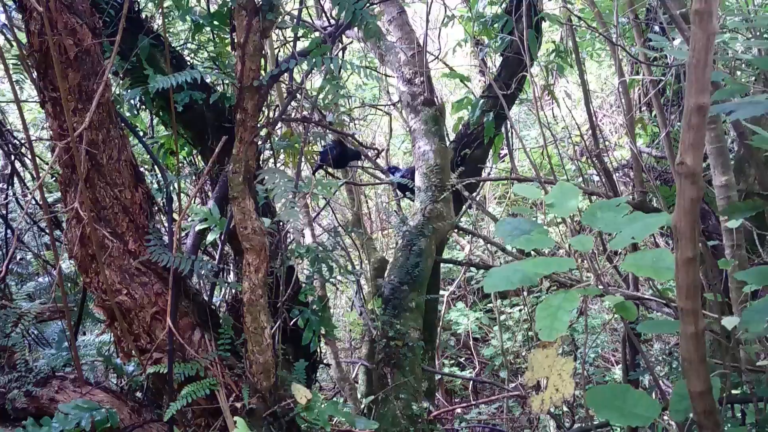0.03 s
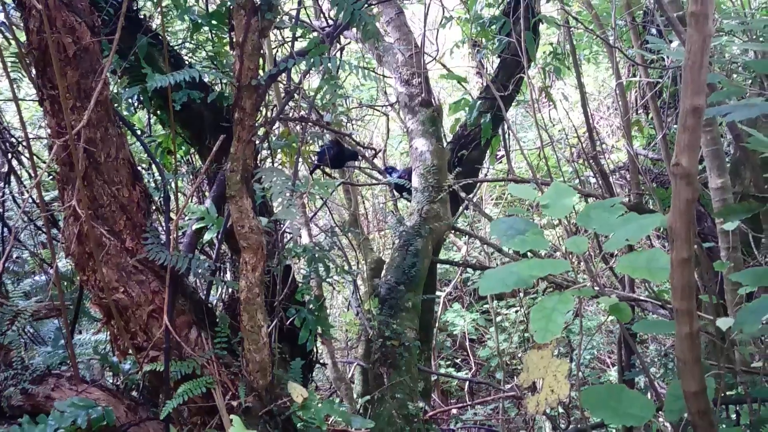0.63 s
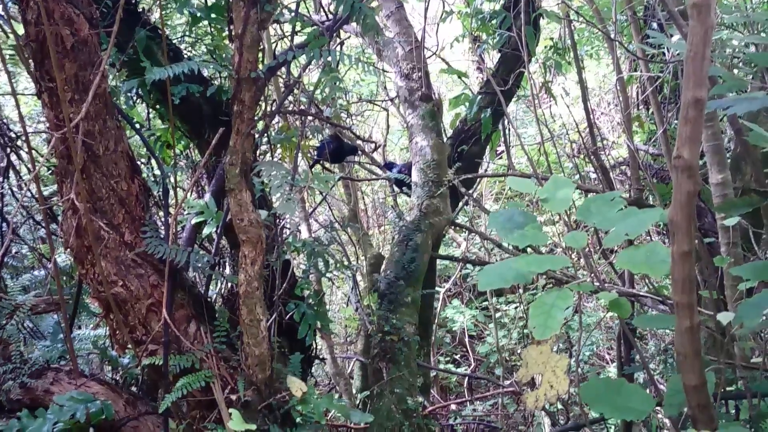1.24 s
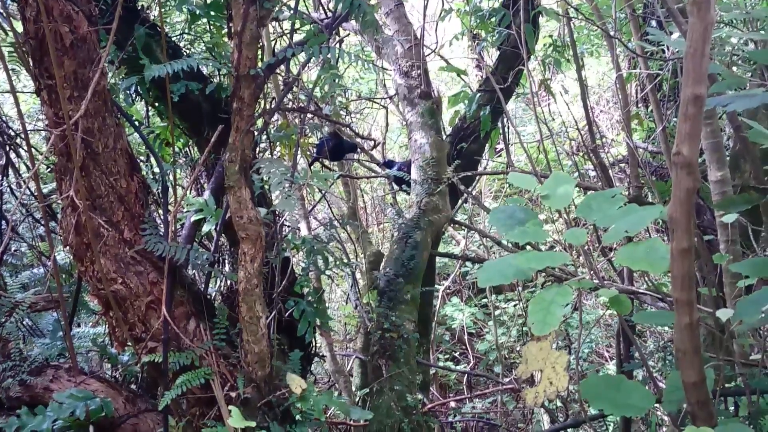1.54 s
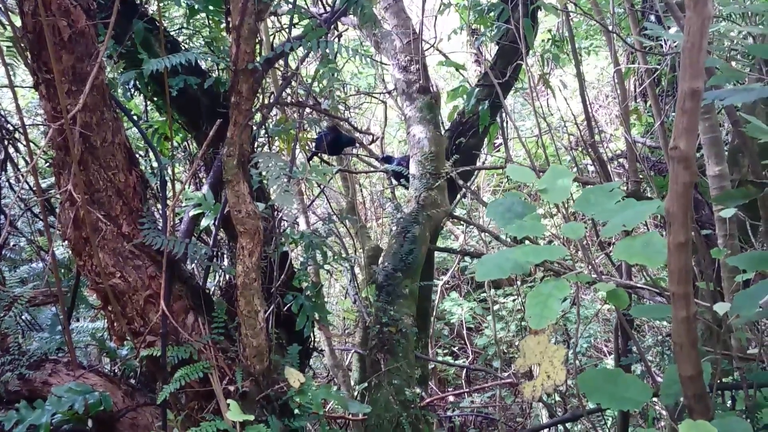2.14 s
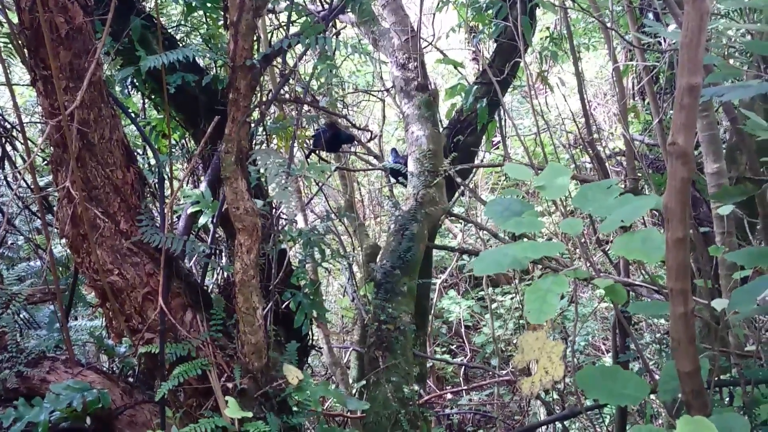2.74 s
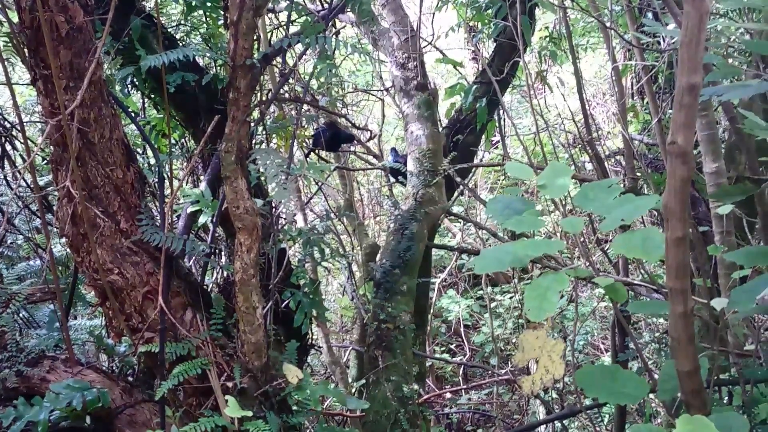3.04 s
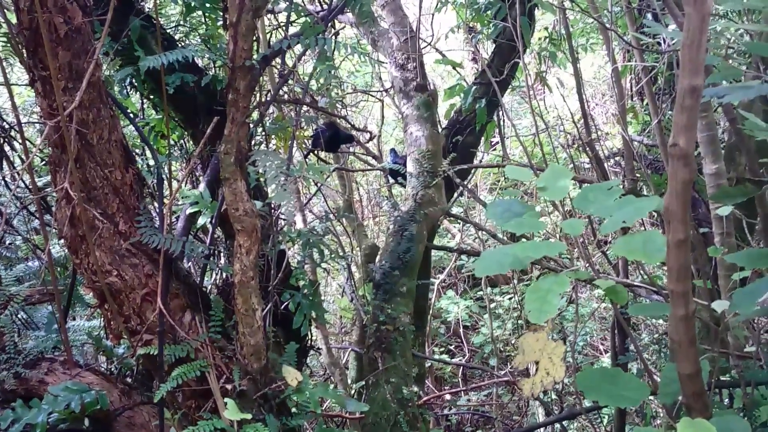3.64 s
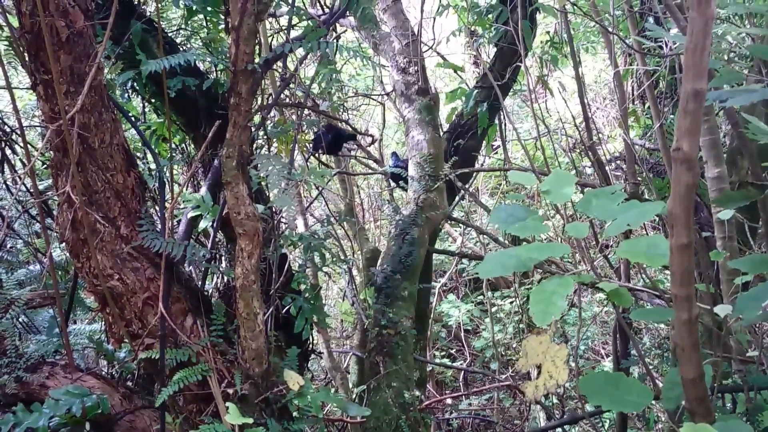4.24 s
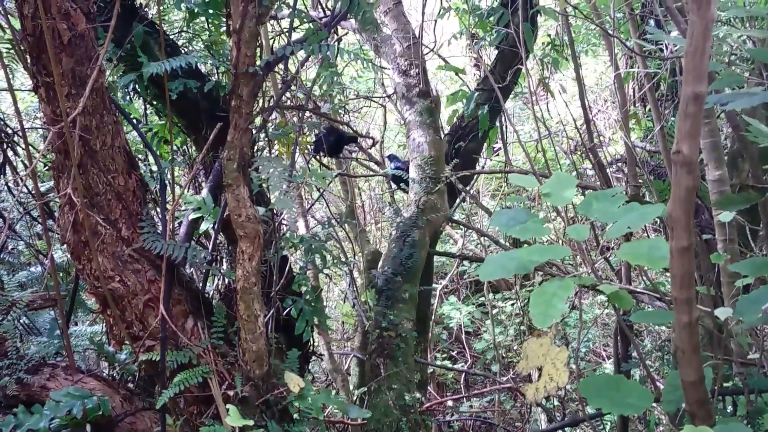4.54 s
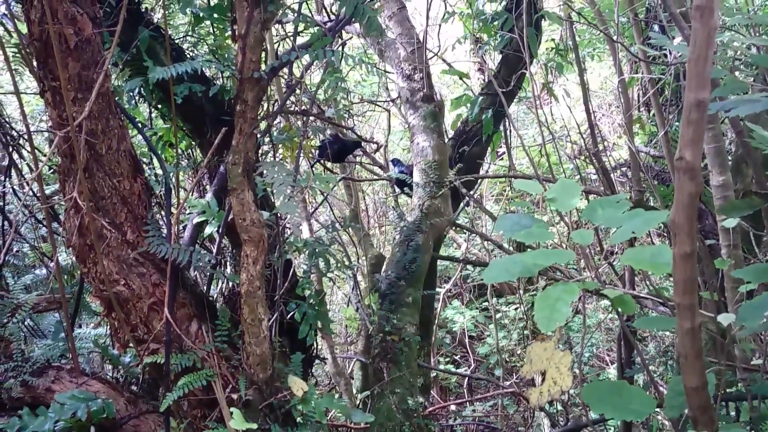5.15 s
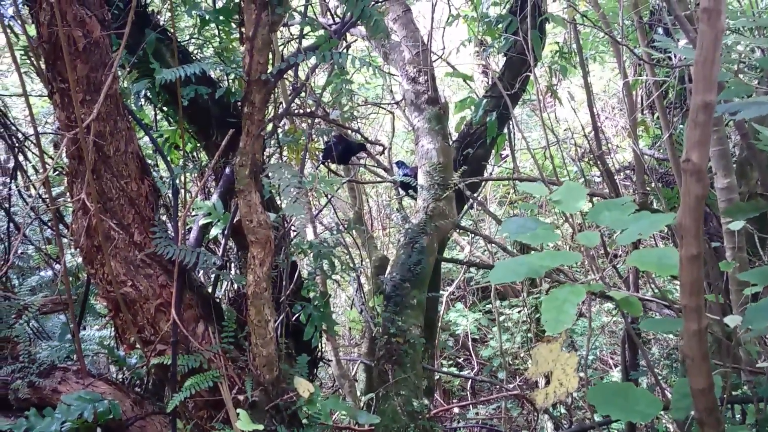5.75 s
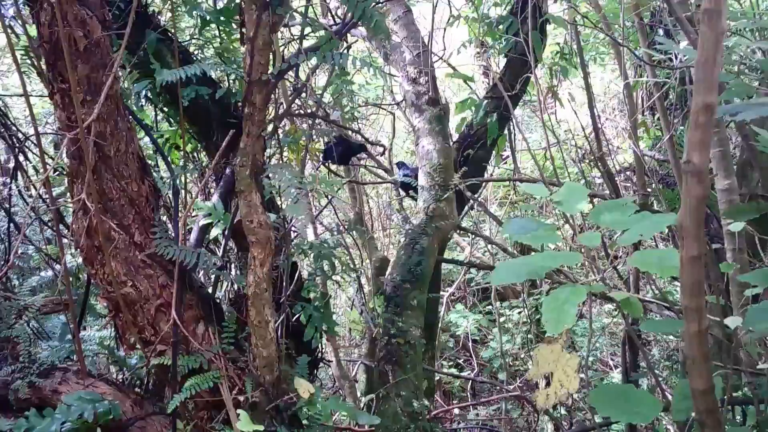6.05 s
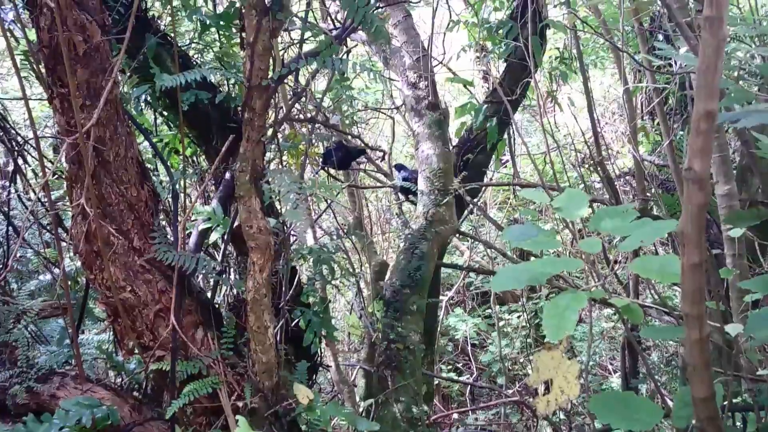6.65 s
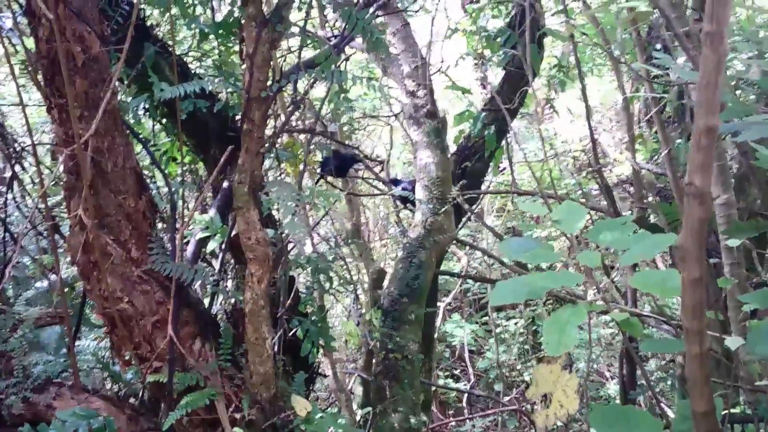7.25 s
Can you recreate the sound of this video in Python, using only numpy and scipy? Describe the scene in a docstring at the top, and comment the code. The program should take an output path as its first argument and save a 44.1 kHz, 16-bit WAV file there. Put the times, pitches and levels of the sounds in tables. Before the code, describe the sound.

A small microphone pop opens onto a quiet forest, and a faint, steady insect hiss comes up at about 0.6 seconds. A distant bird repeats a very faint two-note song until 1.6 seconds. Thin high chirps, pips and far hoarse calls are scattered throughout, with a clearer falling chirp near 3.8 seconds and a few faint, dull handling bumps. From 4.8 to 5.3 seconds a nearby songbird makes seven quick, soft clucks that sink in pitch. A small bird repeats quick upward slides until 6 seconds, and a neighbour whistles softly around 5.6. At 6.6 seconds the close bird gives a loud falling whistle, then a softer, wavering held note. Two short, harsh rasps, the loudest sounds, follow at about 7 and 7.2 seconds, with quiet low notes beneath and after them. The trees add a short, scattered echo.

```python
"""A tui sings in dense forest: windpipe clucks, a loud down-slur, a beating two-voice note from both
sides of the syrinx, then two harsh rasps, trains of snaps that ring throat and beak. A neighbour
whistles softly after the clucks. Smaller birds call over a steady insect hiss; leaves and trunks
scatter every call. A hand-held camera wakes with a pop at the start and takes a few dull bumps;
its two microphones have opposite polarity."""
import sys
import numpy as np
from scipy import signal
from scipy.fft import rfft, irfft, next_fast_len
from scipy.io import wavfile
from scipy.ndimage import uniform_filter1d, minimum_filter1d

SR = 44100
rng = np.random.default_rng(int(sys.argv[2]) if len(sys.argv) > 2 else 0)


def digitize_waveform(pressure):
    """Quantize a signal to 16-bit integers and store it at the path in sys.argv[1].

    Rows of a 2-D input are taken as channels; values are limited to [-1, 1].
    """
    field = np.atleast_2d(pressure).T
    bounded = np.clip(field, -1, 1)
    quanta = np.round(bounded * 32767).astype(np.int16)
    wavfile.write(sys.argv[1], SR, quanta)


N = 326781
T = np.arange(N) / SR

# throat and beak response, one curve per rasp: freq_hz, gain_db
THROAT_CURVES = [
    [(350, -56), (600, -43), (737, -45), (982, -31), (1400, -23.5), (1540, -24.5), (1670, -10.5),
     (2000, -27), (2600, -20.5), (3060, -15), (3510, -28), (3970, -14.5), (4940, -3), (7140, -14),
     (8530, -31.5), (15800, -42.5)],
    [(350, -88), (600, -45), (1170, -26.5), (1310, -23), (1520, -16), (1670, -12), (1890, -18.5),
     (2600, -12.5), (3100, -15), (3910, -20.5), (4940, -0.5), (5660, -3), (6320, -13.5), (6860, -6.5),
     (8770, -28), (15800, -37)],
]


def undb(db):
    """Decibels to gain."""
    return 10 ** (np.asarray(db) / 20)


def unit(x):
    """Scale to rms 1."""
    return x / np.sqrt(np.mean(x ** 2))


def clock(length_s):
    """Sample times of a short sound."""
    return np.arange(int(length_s * SR)) / SR


def decay(t, t60_s):
    """Envelope falling 60 dB in t60_s."""
    return np.exp(-np.log(1000) * t / t60_s)


def add(track, start_s, x):
    """Mix x into the track."""
    i = max(int(start_s * SR), 0)
    track[..., i:i + x.shape[-1]] += x[..., :max(N - i, 0)]


def shape(x, gain):
    """Filter by a gain function of frequency."""
    size = next_fast_len(x.shape[-1])
    freq_hz = np.fft.rfftfreq(size, 1 / SR) + 1e-3
    return irfft(rfft(x, size) * gain(freq_hz), size)[..., :x.shape[-1]]


def colour(points):
    """Gain function through (freq_hz, gain_db) points."""
    hz, db = np.transpose(points)
    return lambda f: undb(np.interp(np.log(f), np.log(hz), db))


def ring(points, size=512):
    """Minimum-phase impulse response of the given colour, unit energy."""
    gain = colour(points)(np.fft.rfftfreq(size, 1 / SR) + 1)
    cepstrum = irfft(np.log(gain))
    cepstrum[1:size // 2] *= 2
    cepstrum[size // 2 + 1:] = 0
    response = irfft(np.exp(rfft(cepstrum)))
    return response / np.linalg.norm(response)


def walk(rate_hz):
    """Smooth random drift, spread near 1."""
    return 1.2 * np.interp(T * rate_hz, np.arange(8192), rng.standard_normal(8192))


def insects(hiss_db=0.5, air_db=3.5, flicker_db=1.46, bass_hz=250, air_follows=0.78):
    """Insect chorus swelling near 5.8 kHz over forest air; bass alike on both microphones."""
    # insect and air spectrum: freq_hz, relative_db
    spectrum = [(18, -40), (30, -28), (64, -2.5), (183, -15), (286, -18), (509, -20), (735, -18.5),
                (1210, -17.5), (1570, -13.5), (2520, -12), (3540, -10.5), (4260, -5.5), (5830, 1.5),
                (7390, -15.5), (15800, -29)]
    # chorus swell: time_s, level_db
    swell = [(.6, -63), (0.8, -61.5), (1.76, -57.5), (2.78, -61.5), (3.44, -60), (4.63, -60), (4.93, -58.5),
             (5.03, -58.5), (6.15, -60), (6.55, -57.5)]
    own, shared = rng.standard_normal((2, N)), rng.standard_normal(N)
    coherence = lambda f: .8 / (1 + (f / bass_hz) ** 2)
    noise = shape(own, lambda f: np.sqrt(1 - coherence(f)))
    noise += shape(shared, lambda f: np.sqrt(coherence(f)))
    forest = shape(noise, colour(spectrum))
    hiss = shape(forest, lambda f: 1 / (1 + ((f - 5800) / 1400) ** 4))
    air = forest - hiss
    time_s, level_db = np.transpose(swell)
    swell_db, median_db = np.interp(T, time_s, level_db), np.median(level_db)
    hiss_gain = undb(swell_db + hiss_db + flicker_db * walk(20))
    air_gain = undb(median_db + air_follows * (swell_db - median_db) + air_db + .5 * walk(3.52))
    return (hiss * hiss_gain + air * air_gain) / hiss.std()


def glides(notes, buzz, buzz_hz, waver=0.0079):
    """Sliding notes; a fast pitch wobble of the syrinx makes them buzz."""
    out = np.zeros(N)
    wobble = 1 + waver * walk(180) + buzz * np.sin(2 * np.pi * buzz_hz * T + walk(90))
    for start_s, length_s, start_hz, end_hz, level_db in notes:
        t = clock(length_s)
        pitch_hz = np.geomspace(start_hz, end_hz, len(t)) * np.interp(start_s + t, T, wobble)
        tone = np.sqrt(2) * np.sin(2 * np.pi * np.cumsum(pitch_hz) / SR)
        add(out, start_s, undb(level_db) * tone * signal.windows.tukey(len(t), .5))
    return out


def couplets(fall_s=0.041, fall_ratio=1.19, fall_db=-2, flat_after_s=.062, flat_s=0.06):
    """Distant two-note song: a short buzzy fall, then a flat note at its end pitch."""
    # couplets: start_s, flat_pitch_hz, level_db
    song = [(.115, 3800, -58.5), (.305, 3745, -60.5), (.508, 3700, -61.5), (.762, 3704, -58),
            (1.0, 3530, -63), (1.255, 3540, -61.5), (1.52, 3484, -59.5)]
    falls = [(s, fall_s, fall_ratio * hz, hz, db + fall_db) for s, hz, db in song]
    flats = [(s + flat_after_s, flat_s, hz, hz, db) for s, hz, db in song]
    return (glides(falls, buzz=0.03, buzz_hz=122, waver=0.017)
            + glides(flats, buzz=.01, buzz_hz=120, waver=0.011))


def thin_notes(faint_count=14, low_hz=1500, high_hz=5450, faint_s=.06, faint_db=-68.5, glide=.03):
    """Single slurs among the trees, plus fainter notes at random times and pitches."""
    # slurs: start_s, length_s, start_hz, end_hz, level_db
    slurs = [(.26, 0.074, 2040, 1930, -65.5), (1.55, 0.027, 908, 895, -64.5),
             (1.87, 0.045, 4280, 4180, -63), (2.97, .07, 3200, 3240, -68), (3.24, 0.05, 3150, 3190, -66),
             (2.28, .05, 1544, 1594, -67), (4.06, 0.049, 1594, 1594, -62.5), (4.7, 0.097, 5440, 5170, -52),
             (5.14, .11, 2540, 2147, -62.5), (5.25, 0.087, 4340, 4260, -57), (5.4, 0.074, 2245, 2160, -61),
             (5.475, 0.094, 4410, 3726, -57), (5.73, .06, 4330, 3560, -60)]
    faint = []
    for when, height, slope in rng.random((faint_count, 3)):
        start_hz = low_hz * (high_hz / low_hz) ** height
        end_hz = start_hz * (1 + glide * (2 * slope - 1))
        faint.append((when * T[-1], faint_s, start_hz, end_hz, faint_db))
    return glides(slurs + faint, buzz=.008, buzz_hz=110)


def handling(body_hz=65, decay_s=0.02):
    """The hand bumps the camera body; each microphone gets the thud at its own phase."""
    # bumps: start_s, level_db
    bumps = [(.61, -67), (.69, -68), (.79, -69), (1.01, -69), (2.748, -63), (2.81, -64), (4.169, -69.5),
             (6.091, -72)]
    out, t = np.zeros((2, N)), clock(.2)
    envelope = t / decay_s * np.exp(1 - t / decay_s)
    for start_s, level_db in bumps:
        phase = 2 * np.pi * (body_hz * rng.uniform(0.73, 1.23) * t + rng.random((2, 1)))
        add(out, start_s, undb(level_db) * np.sin(phase) * envelope)
    return out


def chirps():
    """High falling chirps, buzzing with syrinx wobble."""
    # chirps: start_s, length_s, start_hz, end_hz, level_db
    falls = [(1.61, 0.055, 6130, 5340, -55), (1.84, 0.051, 6900, 4140, -70), (1.88, 0.071, 5800, 5290, -54),
             (2.36, 0.072, 6260, 4390, -48), (3.775, 0.085, 6490, 4275, -43.5)]
    return glides(falls, buzz=0.017, buzz_hz=230)


def hoarse_calls(hoarse_hz=1904, hoarse_width_hz=500, hiss_width_hz=1500):
    """Noise-band calls: a far hoarse bird and high hisses from the canopy."""
    # hoarse bird: start_s, length_s, level_db
    croaks = [(1.87, 0.15, -64.5), (2.849, .2, -68), (3.389, .14, -64.5), (4.182, 0.17, -67),
              (4.368, 0.11, -57.5), (6.001, 0.073, -56), (6.24, .2, -63.5)]
    # canopy hisses: start_s, length_s, centre_hz, level_db
    hisses = [(1.832, 0.065, 5130, -53.5), (2.516, .05, 6360, -61.5), (6.156, .51, 7540, -73.5)]
    bands = [(s, length_s, hoarse_hz, hoarse_width_hz, db) for s, length_s, db in croaks]
    bands += [(s, length_s, hz, hiss_width_hz, db) for s, length_s, hz, db in hisses]
    out = np.zeros(N)
    for start_s, length_s, centre_hz, width_hz, level_db in bands:
        noise = rng.standard_normal(SR)[:int(length_s * SR)]
        call = unit(shape(noise, lambda f: 1 / (1 + (2 * (f - centre_hz) / width_hz) ** 4)))
        add(out, start_s, undb(level_db) * call * signal.windows.tukey(len(call), .5))
    return out


def pips(count=4, start_s=2.87, every_s=0.12, length_s=0.062, start_hz=5900, end_hz=5870, db=-59.5):
    """Even run of thin, rough, nearly flat pips."""
    notes = [(start_s + k * every_s, length_s, start_hz, end_hz, db) for k in range(count)]
    return glides(notes, buzz=.012, buzz_hz=150, waver=0.0112)


def clucks(start_hz=990, rest_hz=624, sink_s=0.29, bright_db=-1.5, dull_db_per_s=72):
    """Snaps ring the windpipe: a sagging low mode, upper modes, a tick. The run sinks and dulls."""
    # clucks: start_s, level_db
    run = [(4.788, -45.5), (4.890, -47), (4.977, -45.5), (5.049, -46.5), (5.117, -46), (5.183, -45.5),
           (5.253, -44.5)]
    # upper windpipe modes: freq_hz, t60_s, gain_db
    modes = [(2820, 0.019, 10), (4900, 0.023, 18), (5080, 0.018, 19), (7200, 0.0057, -2)]
    sag, sag_s, low_t60_s = 0.22, 0.0029, 0.037
    tick_db, tick_s, rise_s = 13, 0.0012, .0005
    out, t = np.zeros(N), clock(.08)
    upper = sum(undb(db) * np.sin(2 * np.pi * hz * t) * decay(t, t60_s) for hz, t60_s, db in modes)
    attack = 1 - np.exp(-t / rise_s)
    for start_s, level_db in run:
        elapsed_s = start_s - run[0][0]
        centre_hz = rest_hz + (start_hz - rest_hz) * np.exp(-elapsed_s / sink_s)
        pitch_hz = centre_hz * (1 + sag * (np.exp(-t / sag_s) - .5))
        low = np.sin(2 * np.pi * np.cumsum(pitch_hz) / SR) * decay(t, low_t60_s)
        throat_noise = signal.fftconvolve(rng.standard_normal(len(t)), ring(THROAT_CURVES[1]), "same")
        tick = undb(tick_db) * unit(throat_noise) * np.exp(-t / tick_s)
        brightness = undb(bright_db - dull_db_per_s * elapsed_s)
        add(out, start_s, undb(level_db) * (low + brightness * (upper + tick)) * attack)
    return out


def flicks(length_s=.038, start_hz=4780, end_hz=6070):
    """A small bird repeats one quick upward slide."""
    # flicks: start_s, level_db
    repeats = [(5.378, -49.5), (5.548, -54), (5.688, -58), (5.854, -52.5), (6.028, -50)]
    return glides([(s, length_s, start_hz, end_hz, db) for s, db in repeats], buzz=0.014, buzz_hz=112)


def whistles(notes, overtones_db, breath_db, waver=0.0079, drop_db=-17):
    """Syrinx near-sines that swell, hold, then slide and fade; overtones and breath grow with effort."""
    out = np.zeros(N)
    for start_s, attack_s, held_s, drop_s, start_hz, held_hz, end_hz, level_db in notes:
        t = clock(held_s + drop_s)
        corners_s = [0, held_s, held_s + drop_s]
        pitch_hz = np.exp(np.interp(t, corners_s, np.log([start_hz, held_hz, end_hz])))
        phase = 2 * np.pi * np.cumsum(pitch_hz * (1 + waver * walk(206)[:len(t)])) / SR
        swell = np.sin(np.pi / 2 * np.clip(t / attack_s, 1e-3, 1))
        envelope_db = level_db + 20 * np.log10(swell) + np.interp(t, corners_s, [0, 0, drop_db])
        effort = undb(0.89 * (envelope_db + 34))
        breath = undb(breath_db) * np.diff(rng.standard_normal(SR))[:len(t)]
        overtones = sum(undb(db) * np.sin(k * phase) for k, db in enumerate(overtones_db, 2))
        tone = np.sin(phase) + effort * (breath + overtones)
        add(out, start_s, np.sqrt(2) * undb(envelope_db) * tone * signal.windows.tukey(len(t), .08))
    return out


def neighbour():
    """Soft whistle from further off: rises slowly, drops at the end."""
    # whistles: start_s, attack_s, held_s, drop_s, start_hz, held_hz, end_hz, level_db
    notes = [(5.602, 0.015, 0.039, 0.034, 1617, 1607, 1650, -52),
             (5.66, 0.036, .077, 0.0487, 1650, 1775, 1080, -55.5)]
    return whistles(notes, overtones_db=(), breath_db=-50)


def tui_whistles():
    """The tui's pure notes; the two sides of the syrinx beat where they overlap."""
    # whistles: start_s, attack_s, held_s, drop_s, start_hz, held_hz, end_hz, level_db
    notes = [(6.579, 0.042, 0.031, .031, 1785, 1755, 1054, -17),
             (6.705, 0.04, 0.16, 0.041, 1060, 1047, 900, -35),
             (6.715, .05, 0.074, 0.063, 1112, 1154, 1100, -42),
             (7.04, 0.1, 0.073, 0.066, 857, 608, 514, -47), (7.27, 0.026, 0.056, .03, 598, 570, 554, -53),
             (7.295, 0.016, 0.039, .04, 683, 680, 685, -42.5)]
    return whistles(notes, overtones_db=(-32, -44, -49), breath_db=-55)


def snaps(length_s, gap_s, count=14, lag_s=.0098, settle_snaps=1.2):
    """Rows of (offset_s, gain_db) for one rasp: snaps speed up and swell, hold, then fade."""
    attack_s, attack_db, fade_from_s, fade_db_per_s = 0.032, -8, 0.057, 286
    k = np.arange(count)
    offset_s = k * gap_s + lag_s * (1 - np.exp(-k / settle_snaps))
    gain_db = attack_db * np.maximum(1 - offset_s / attack_s, 0)
    gain_db -= fade_db_per_s * np.maximum(offset_s - fade_from_s, 0)
    gain_db += 0.1 * rng.standard_normal(count)
    return np.transpose([offset_s, gain_db])[offset_s < length_s]


def rasps(snap_s=0.0013, air_db=-8, air_s=0.014, shelf_hz=2500, low_db=-1, open_db_per_s=44):
    """The syrinx snaps about 100 times a second; each snap and its air ring the throat and beak."""
    # rasps: start_s, length_s, snap_gap_s, level_db
    calls = [(6.955, .098, .0095, -11.5), (7.1528, .098, .0105, -11)]
    out, t = np.zeros(N), clock(0.087)
    envelope = np.exp(-t / snap_s) + undb(air_db) * np.exp(-t / air_s)
    for (start_s, length_s, gap_s, level_db), throat in zip(calls, THROAT_CURVES):
        for offset_s, gain_db in snaps(length_s, gap_s):
            puff = rng.standard_normal(len(t)) * envelope
            # low throat resonances open through the rasp
            low_gain = undb(low_db + open_db_per_s * offset_s)
            shelf_db = lambda f: 20 * np.log10(1 + (low_gain - 1) / (1 + (f / shelf_hz) ** 4))
            burst = signal.fftconvolve(puff, ring([(hz, db + shelf_db(hz)) for hz, db in throat]))
            burst /= np.sqrt(np.sum(burst ** 2) / (snap_s * SR))
            add(out, start_s + offset_s, undb(level_db + gain_db) * burst)
    return out


def trees(x, direct_db, leaves_db, trunks_db, deep_db):
    """Direct sound, quick treble scatter from leaves, sparse trunk echoes and a long tail; stereo."""
    t = clock(1)

    def scatter(t60_s, first_s, clump):
        echoes = rng.standard_normal((2, len(t))) * np.exp(clump * rng.standard_normal(len(t)))
        echoes *= (t > first_s) * decay(t, t60_s)
        return echoes / np.linalg.norm(echoes, axis=1, keepdims=True)

    highpass = signal.butter(1, 2500, "high", fs=SR, output="sos")
    leaves = signal.sosfilt(highpass, scatter(t60_s=0.083, first_s=0.00081, clump=0.88))
    trunks = scatter(t60_s=0.26, first_s=.012, clump=0.59)
    tail = scatter(t60_s=0.81, first_s=.04, clump=0.7)
    response = undb(leaves_db) * leaves + undb(trunks_db) * trunks + undb(deep_db) * tail
    response[:, 0] += undb(direct_db)
    return signal.fftconvolve(x[None], response, axes=1)[:, :N]


def circuit_noise(level_db=-84, corner_hz=350):
    """Dull self-noise of the input stage."""
    noise = shape(rng.standard_normal((2, N)), lambda f: 1 / np.hypot(1, f / corner_hz))
    return undb(level_db) * unit(noise)


def wake_pop(level_db=-42, ring_hz=70, ring_s=0.011, spike_s=0.0012, left_gain=0.23):
    """The input wakes with a spike and a low damped ring, mostly on the right."""
    t = clock(.1)
    thump = np.cos(2 * np.pi * ring_hz * t + 1) * np.exp(-t / ring_s)
    return -undb(level_db) * (thump + np.exp(-t / spike_s)) * np.array([[left_gain], [1]])


def limit(x, ceiling=0.8, smooth_s=0.001516):
    """Fast limiter; rounds off the loudest snaps."""
    size = int(smooth_s * SR)
    gain = np.minimum(1, ceiling / (np.abs(x).max(axis=0) + 1e-9))
    return x * uniform_filter1d(minimum_filter1d(gain, 2 * size), size)


def scene(flutter_db=2, neighbour_lag_s=.0002):
    """The tui close by, other birds far off, insects all round."""
    whistled = trees(tui_whistles(), direct_db=-1.5, leaves_db=-14, trunks_db=-18, deep_db=-28)
    clucked = trees(clucks(), direct_db=4.5, leaves_db=1, trunks_db=-4.5, deep_db=-12)
    rasped = trees(rasps(), direct_db=1.5, leaves_db=3, trunks_db=-4, deep_db=-21)
    far_calls = (thin_notes() + hoarse_calls()) * undb(flutter_db * walk(70))
    far = trees(far_calls + flicks(), direct_db=1, leaves_db=-3, trunks_db=-6.5, deep_db=-10)
    sung = trees(couplets() + pips(), direct_db=-7.5, leaves_db=0.5, trunks_db=-5, deep_db=-14)
    chirped = trees(chirps(), direct_db=-8, leaves_db=-6, trunks_db=-1, deep_db=-5.5)
    answered = trees(neighbour(), direct_db=-1, leaves_db=-8, trunks_db=-9, deep_db=-16)
    # off to one side: reaches the right microphone later
    answered[1] = np.roll(answered[1], int(neighbour_lag_s * SR))
    return whistled + clucked + rasped + far + sung + chirped + answered + insects() + handling()


def record(dry, wake_s=.14, full_gain_s=.573, waking_db=-15, left_lag_s=2.5e-5, top_hz=15800):
    """The input wakes, runs briefly at low gain, then opens; the right microphone is inverted."""
    # unequal microphone port resonances: freq_hz, left_minus_right_db
    ports = [(400, 2.5), (1100, 2), (1800, 2.5), (2500, -1), (4700, 1), (5200, 3.5), (5800, -6.5),
             (6700, -4), (8000, -6), (11000, -0.5)]
    balance = colour(ports)
    left = shape(dry[0], lambda f: balance(f) ** .5 * np.exp(-2j * np.pi * f * left_lag_s))
    right = shape(dry[1], lambda f: balance(f) ** -.5)
    gain = np.where(T < full_gain_s, undb(waking_db), 1)
    out = (np.array([left, right]) * gain + circuit_noise()) * (T > wake_s)
    add(out, wake_s, wake_pop())
    out = limit(out) * np.array([[1], [-1]])
    return signal.sosfilt(signal.ellip(10, .2, 70, top_hz, fs=SR, output="sos"), out)


dry = scene()
out = record(dry)
digitize_waveform(out)
```